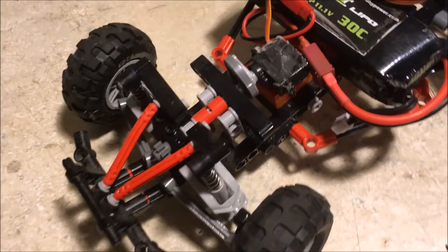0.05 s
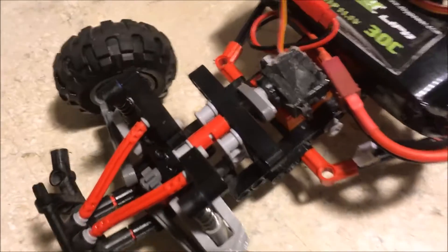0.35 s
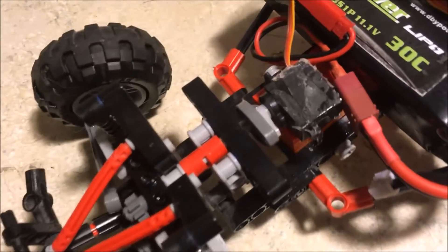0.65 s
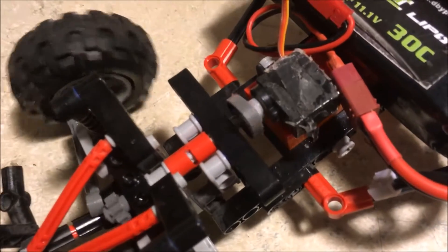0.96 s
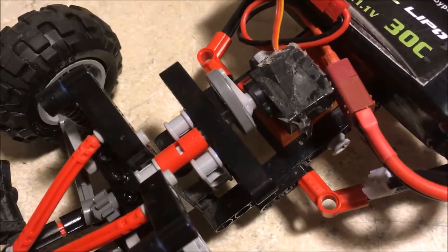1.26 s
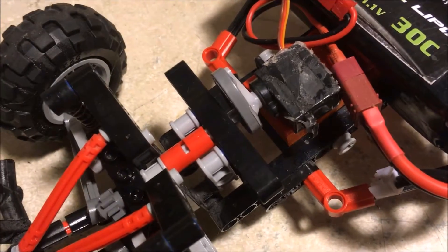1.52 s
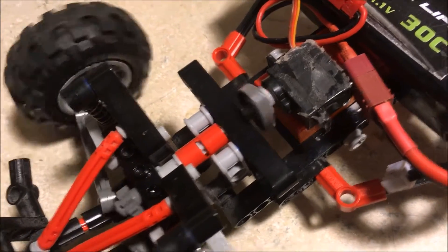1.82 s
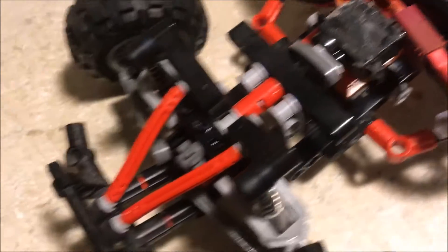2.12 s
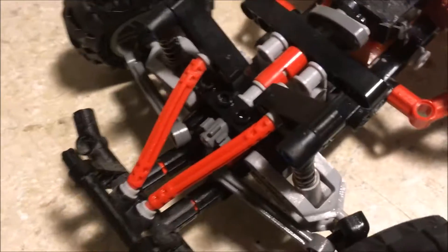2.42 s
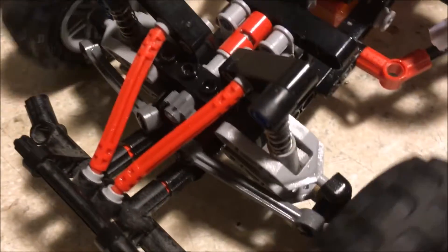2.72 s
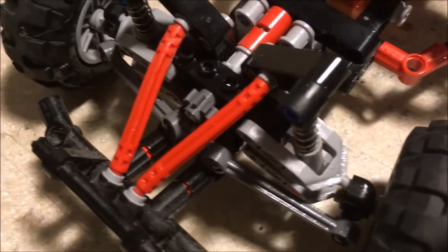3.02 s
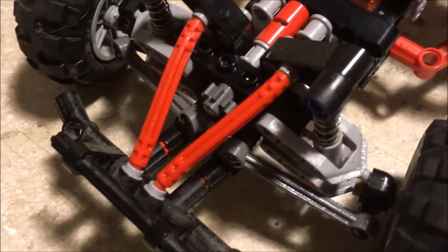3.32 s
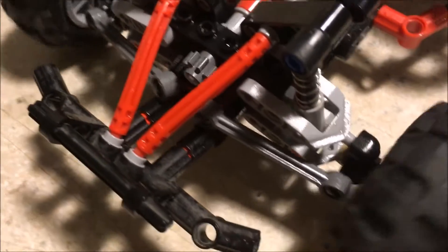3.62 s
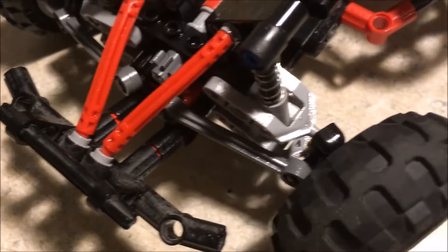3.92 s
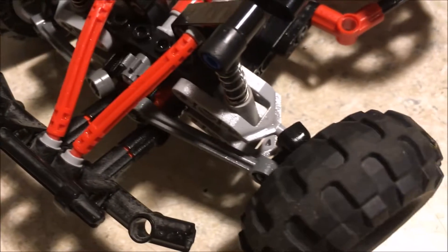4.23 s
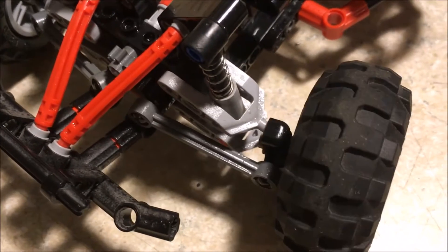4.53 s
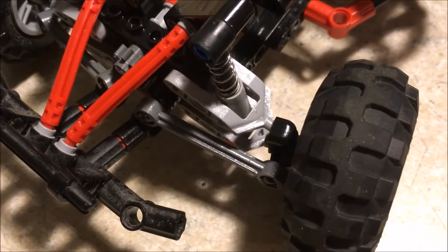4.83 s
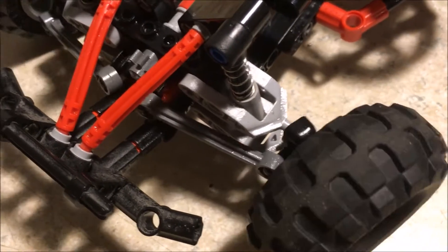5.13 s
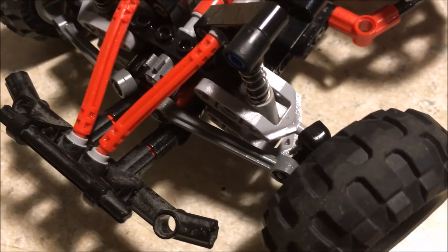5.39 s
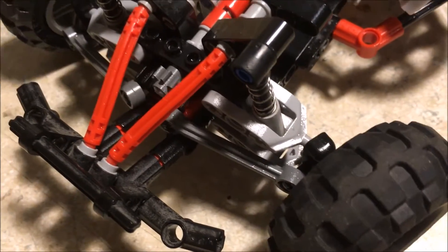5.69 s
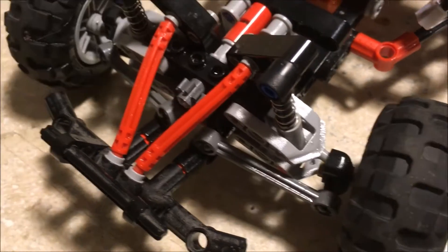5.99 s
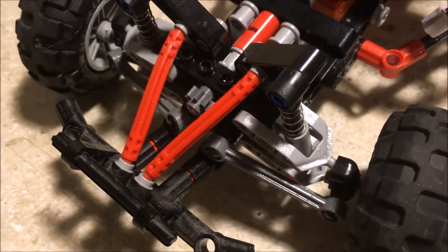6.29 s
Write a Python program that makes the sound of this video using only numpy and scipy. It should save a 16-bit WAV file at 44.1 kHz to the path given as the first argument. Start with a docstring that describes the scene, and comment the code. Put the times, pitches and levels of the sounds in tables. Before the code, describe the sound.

Close to a plastic toy car in a small room, a steering servo ticks rapidly as it holds still, then whirs briefly with rattling gears and a soft plastic knock. This repeats about eight times, a couple of the whirs coming as quick doubles. The tone shifts slightly as the microphone goes from above the servo to the front axle. A low machine hum and faint hiss continue underneath.

```python
"""Close up, a hobby servo whirs in short bursts, swinging a plastic toy car's front wheels side to side.
On each swing its gear teeth rattle the case, the mesh growls in the chassis and the steering links knock.
Between swings it holds the wheels with one tick per control pulse. The car stands on a hard floor in a
small room where mains-driven machines hum; the microphone is above the servo, later at the front axle."""
import sys
import numpy as np
from scipy import signal
from scipy.fft import rfft, irfft
from scipy.io import wavfile
from scipy.ndimage import uniform_filter1d

SR = 44100
rng = np.random.default_rng(int(sys.argv[2]) if len(sys.argv) > 2 else 0)


def digitize_waveform(pressure):
    """Quantize a signal to 16-bit integers and store it at the path in sys.argv[1].

    Rows of a 2-D input are taken as channels; values are limited to [-1, 1].
    """
    field = np.atleast_2d(pressure).T
    bounded = np.clip(field, -1, 1)
    quanta = np.round(bounded * 32767).astype(np.int16)
    wavfile.write(sys.argv[1], SR, quanta)


N = 288837

# The servo case's resonances, heard from above and from the front axle.
# Each row: frequency in Hz, width in Hz, relative level in dB.
CASE_FROM_ABOVE = [(3350, 700, -23), (4280, 450, -17), (5350, 450, -19), (6650, 500, -14), (7100, 350, -18),
                   (8050, 400, -12), (8850, 650, 0), (9450, 600, 0), (11300, 800, -13), (12300, 1000, -7),
                   (13600, 1200, -10.5), (15100, 1300, -10)]
CASE_FROM_AXLE = [(3300, 900, -23), (4270, 400, -10), (5350, 550, -14), (6750, 1100, -6), (8600, 550, -4),
                  (9450, 700, 1), (11150, 750, 0), (12000, 900, -2), (13400, 900, 1), (14500, 1000, -3),
                  (15300, 900, -5)]
MIC_MOVE_S = 2.4  # from here on the microphone is at the axle


def undb(db):
    """Decibels to gain."""
    return 10 ** (np.asarray(db) / 20)


def unit(x):
    """Scale to rms 1."""
    return x / np.sqrt(np.mean(x ** 2) + 1e-18)


def add(out, start_s, x):
    """Mix x into out from start_s."""
    i = max(int(start_s * SR), 0)
    out[i:i + len(x)] += x[:max(N - i, 0)]


def through(x, response):
    """Convolve, keeping the length."""
    return signal.fftconvolve(x, response)[:len(x)]


def bandpass(x, low_hz, high_hz):
    """Keep one band, with gentle slopes."""
    return signal.sosfilt(signal.butter(2, [low_hz, high_hz], "band", fs=SR, output="sos"), x)


def flatten(x, bins=41):
    """Flatten the broad spectrum of a burst, leaving its fine peaks; unit energy."""
    spectrum = rfft(x)
    broad_power = uniform_filter1d(np.abs(spectrum) ** 2, bins)
    flat = irfft(spectrum / np.sqrt(broad_power + 1e-18), len(x))
    return flat / np.linalg.norm(flat)


def steady_noise(points, rms_db):
    """Noise whose spectrum follows (Hz, relative dB) points."""
    hz, db = np.transpose(points)
    f = np.fft.rfftfreq(N, 1 / SR)
    shape = undb(np.interp(np.log(f + 1), np.log(hz), db))
    return undb(rms_db) * unit(irfft(rfft(rng.standard_normal(N)) * shape, N))


def tail(t60, size):
    """Dense decaying reflections of unit energy."""
    response = rng.standard_normal(size) * np.exp(-np.log(1000) * np.arange(size) / SR / t60)
    return response / np.linalg.norm(response)


def damped_mode(hz, t60, size):
    """One struck resonance, falling 60 dB in t60 seconds."""
    t = np.arange(size) / SR
    return np.sin(2 * np.pi * hz * t) * np.exp(-np.log(1000) * t / t60)


def room_tone():
    """Across the room, motors near the mains frequency beat against each other over moving air."""
    # The machines' hum. Each row: frequency in Hz, rms level in dB.
    hum_tones = [(58.6, -45), (112.6, -51), (117.2, -57), (119.8, -52), (171.5, -66), (188.3, -61),
                 (225.1, -63), (258.3, -66), (351.6, -70), (360, -68), (410.3, -69)]
    # Spectra of moving air, low rumble and high hiss. Each row: frequency in Hz, relative density in dB.
    air = [(82, -15.5), (140, -11), (222, -0.5), (302, -10.5), (348, -6), (381, -16), (411, -9.5),
           (581, -19.5), (636, -16.5), (1730, -33), (3000, -35.5), (3900, -37), (6600, -120)]
    rumble = [(20, -41), (45, -5), (70, -8), (125, -3), (160, -13.5), (400, -79)]
    hiss = [(1500, -62), (3000, -4.5), (7000, 13), (11000, 7.5), (16000, 18.5)]
    t = np.arange(N) / SR
    hum = sum(np.sqrt(2) * undb(db) * np.sin(2 * np.pi * (hz * t + rng.random())) for hz, db in hum_tones)
    return hum + steady_noise(air, rms_db=-53) + steady_noise(rumble, -55.5) + steady_noise(hiss, -63)


def shell(modes, t60, ring_db, skirt=1.559, low_cut_hz=3000, size=4096):
    """Impulse response of a small plastic shell: broad resonances, little bass, weak modes ringing on."""
    f = np.fft.rfftfreq(size, 1 / SR)
    power = sum(undb(db) ** 2 / (1 + (2 * (f - hz) / width) ** 2 / skirt) ** skirt
                for hz, width, db in modes)
    power *= 1e-3 + 1 / (1 + (low_cut_hz / (f + 1)) ** 6)
    cepstrum = irfft(np.log(power))[:size // 2]  # minimum phase keeps the attack sharp
    cepstrum[0] /= 2
    strike = irfft(np.exp(rfft(cepstrum, size)))
    ring = undb(ring_db) * tail(t60, size)
    ring[0] += 1
    response = through(strike, flatten(ring))[:size // 2]
    return response / np.linalg.norm(response)


def chassis():
    """Impulse response of the frame and steering links."""
    # The frame's modes. Each row: frequency in Hz, 60 dB decay time in seconds, relative level in dB.
    frame_modes = [(459.37, 0.04473, 0), (521.97, 0.06108, 2.5), (569.13, 0.05512, 1),
                   (680.55, 0.1483, -6.5), (966.6, 0.02377, -9), (1128.6, 0.02264, -17),
                   (1199.5, 0.1143, -13.5), (1450.8, 0.1734, -25)]
    response = sum((-1) ** k * undb(db) * damped_mode(hz, t60, size=6000)
                   for k, (hz, t60, db) in enumerate(frame_modes))
    return response / np.abs(response).max()


def lid():
    """Impulse response of the servo's lid, which sings along on one narrow note."""
    # The lid's mode: frequency in Hz, 60 dB decay time in seconds, level in dB against the case.
    lid_mode = (4300, 0.02913, -24.5)
    hz, t60, db = lid_mode
    response = damped_mode(hz, t60, size=2048)
    return undb(db) * response / np.linalg.norm(response)


def chatter(decay_s, size=2048):
    """Loose parts chatter for an instant: a fast-fading burst of noise, longer ones with more energy."""
    t = np.arange(size) / SR
    burst = rng.standard_normal(size) * np.exp(-(t / decay_s) ** 2)
    return np.sqrt(decay_s * SR) * flatten(burst, bins=33)[:size * 3 // 4]


def pivot_squeak():
    """A steering pivot squeaks once: a faint tone that swells and fades."""
    # The squeak: start in seconds, length in seconds, pitch in Hz, peak level in dB.
    squeak = (2.725, .04, 1178, -48)
    start, length_s, hz, db = squeak
    t = np.arange(int(length_s * SR)) / SR
    out = np.zeros(N)
    add(out, start, undb(db) * np.sin(np.pi * t / length_s) * np.sin(2 * np.pi * hz * t))
    return out


def link_knocks(crack_gain_db=2, scrape=0.05431):
    """Loose steering links take up their play and thud on the chassis with a short crack."""
    # The knocks. Each row: start in seconds, relative levels of thud and crack in dB.
    knocks = [(.218, -46.5, -45), (.238, -54.5, -45.5), (.377, -44, -50.5), (1.047, -39.5, -43.5),
              (1.075, -40, -55), (1.818, -41.5, -44), (1.931, -38, -56), (2.727, -41.5, -45.5),
              (3.555, -47, -44.5), (3.589, -41.5, -46.5), (3.719, -35, -51), (4.376, -40.5, -44.5),
              (5.024, -43, -41.5), (5.097, -29, -36.5)]
    blows, cracks = np.zeros(N), np.zeros(N)
    for start, thud_db, crack_db in knocks:
        blow = scrape * chatter(decay_s=0.011263)
        blow[0] += 1
        add(blows, start, undb(thud_db) * blow)
        add(cracks, start, undb(crack_db + crack_gain_db) * chatter(decay_s=0.015303))
    return through(blows, chassis()) + bandpass(cracks, 950, 2200)


def servo_holding(control_hz=45.15, tick_s=0.00158, variation=0.8397, tick_gain_db=-6, jerk_gain_db=-1):
    """Each control pulse ticks the motor, lower and less even under strain; longer pulses jerk the gears."""
    # The holds. Each row: first tick in seconds, end in seconds, relative level in dB, strain from 0 to 1.
    holds = [(.0049, .14, -41, 0), (.469, .94, -41.5, 0.69), (1.268, 1.79, -39.5, 0.88),
             (2.041, 2.67, -42, 0), (2.972, 3.5, -37.5, 0), (3.835, 4.29, -41, 0.02),
             (4.566, 5.0, -38.5, 0), (5.252, 5.75, -40.5, 0.08), (6.006, 6.55, -39.5, 0.13)]
    # The jerks. Each row: start in seconds, relative level in dB, decay time in seconds.
    jerks = [(0.139, -42, 0.006527), (.16, -34.5, 0.00464), (0.581, -38, 0.00138), (.757, -35.5, 0.00104),
             (0.955, -38, 0.01292), (0.98, -36, 0.00962), (1.333, -35, 0.000837), (1.421, -33.5, 0.0005687),
             (1.799, -33, 0.006223), (2.086, -49.5, 0.001566), (2.6833, -35, 0.012266),
             (2.715, -29, 0.00934), (3.06, -35.5, 0.0018), (3.104, -33, 0.000828), (3.327, -43.5, 0.001053),
             (3.503, -40.5, 0.007217), (3.525, -33, 0.00814), (4.3, -37, 0.01016), (4.328, -33.5, 0.008686),
             (5.01, -34, 0.00452), (5.039, -46.5, 0.00511), (5.756, -39.5, 0.00966),
             (6.073, -36.5, 0.000698)]
    # Resonances of a light tick and of one against a strained linkage.
    # Each row: frequency in Hz, width in Hz, relative level in dB.
    light_modes = [(4350, 330, -4), (6100, 1000, -11), (8650, 450, -7), (9800, 450, -3), (11300, 450, 3),
                   (12600, 500, -2), (13780, 480, 2.5), (15000, 550, -1)]
    strained_modes = [(2150, 500, -13), (3950, 400, -3), (4400, 550, 0), (5300, 750, 0), (6300, 800, -6),
                      (7500, 600, -6), (9500, 2000, -7), (11700, 1200, -6), (12900, 800, -2),
                      (14300, 900, -7), (15400, 700, -4)]
    out = np.zeros(N)
    for first, end, db, strain in holds:
        common = chatter(tick_s)  # makes the ticks of one hold sound alike
        light = shell(light_modes, t60=0.05677, ring_db=-5.5)
        strained = shell(strained_modes, t60=0.09066, ring_db=-7.5)
        ring = (1 - strain) * light + strain * strained
        ring /= np.linalg.norm(ring)
        scatter_db = 2.57 + 2 * strain
        for start in np.arange(first, end, 1 / control_hz):
            tick_db = db + tick_gain_db + scatter_db * rng.uniform(-1.9493, 2.3484)
            tick = (common + variation * chatter(tick_s)) / np.hypot(1, variation)
            add(out, start, undb(tick_db) * through(tick, ring))
    snap, above, axle = (shell(modes, t60=0.012014, ring_db=7.5)
                         for modes in (strained_modes, CASE_FROM_ABOVE, CASE_FROM_AXLE))
    for start, db, decay_s in jerks:
        # short jerks snap against the linkage, long ones rattle the case
        snap_share = np.exp(-(decay_s / 0.004694) ** 2)
        case = above if start < MIC_MOVE_S else axle
        ring = np.sqrt(snap_share) * snap + np.sqrt(1 - snap_share) * case
        ring /= np.linalg.norm(ring)
        add(out, start, undb(db + jerk_gain_db) * through(chatter(decay_s), ring))
    return out


def tooth_impacts(phase, scatter_db=2, jitter_cycles=0.25):
    """Gear teeth meet: one click per cycle of phase, uneven in strength and timing."""
    cycles = np.arange(1, int(phase[-1]))
    timing, strength = rng.standard_normal((len(cycles), 2)).T
    at = np.interp(cycles + jitter_cycles * timing, phase, np.arange(len(phase))).astype(int)
    return np.bincount(at, undb(scatter_db * np.clip(strength, -2, 2)), len(phase))


def gear_swing(motion, case, pitch_sag=0.25, unsteady=0.024, throb=0.401, drag_db=3, slack_grind=0.7852,
               bite_s=0.009154, release_s=0.008066, ease_db_per_s=55.5):
    """The motor spins up and brakes; pinion teeth rattle the case, a slower mesh growls under load."""
    length_s, spin_up_s, brake_s, top_hz, rattle_db, play_s, load_s, growl_db, grind_db = motion
    t = np.arange(int(length_s * SR)) / SR
    braking = np.clip(1 - (t[-1] - t) / brake_s, 0, 1)
    drive = (1 - np.exp(-t / spin_up_s)) * (1 - braking ** 2)
    speed = 1 - pitch_sag * (1 - drive)
    # the load builds as the links bite, eases as the wheels turn and drops as the links go slack
    loaded_s, slack_s = np.maximum(t - play_s, 0), np.maximum(t - play_s - load_s, 0)
    grip = (1 - np.exp(-loaded_s / bite_s)) * np.exp(-slack_s / release_s)
    ease = undb(-ease_db_per_s * loaded_s)
    rattle_gain = undb(rattle_db) * drive ** 1.7224
    growl_gain = undb(growl_db) * drive * grip * ease
    grind_gain = undb(grind_db - 1) * drive * (slack_grind + (1 - slack_grind) * grip) * ease
    wobble = unit(bandpass(rng.standard_normal(len(t)), 12, 70))
    flutter = unit(bandpass(rng.standard_normal(len(t)), 30, 130.27))
    mesh_phase = np.cumsum(top_hz * speed * (1 + unsteady * wobble)) / SR
    # the pinion meshes four times as fast; its load swells with every tooth of the slower gear
    load = (1 + throb * np.cos(2 * np.pi * mesh_phase)) * undb(2.32 * flutter)
    teeth = tooth_impacts(4 * mesh_phase) * load
    rattle = unit(through(teeth - teeth.mean(), case))
    growl = unit(np.sin(2 * np.pi * mesh_phase) * undb(3 * flutter))
    # tooth flanks slide under the same load, harder whenever the motor drags, and shake the chassis
    sliding = load * undb(-drag_db * wobble) * rng.standard_normal(len(t))
    clatter = undb(-11) * unit(through(sliding, chassis()))
    grind_low = unit(bandpass(sliding, 900, 1643.5))
    grind_high = undb(-0.5) * unit(bandpass(sliding, 1800, 2618.9))
    grind = unit(grind_low + grind_high)
    return rattle_gain * rattle + grind_gain * grind + growl_gain * (growl + clatter)


def servo_steering(detune=0.006, scatter_db=1, tilt_centre_hz=9000):
    """The servo swings the wheels; the case's ring varies a little in pitch and brightness each time."""
    # The swings. Each row: start, length, spin-up and braking in seconds, full-speed mesh rate in Hz,
    # relative rattle level in dB, free play and time under load in seconds,
    # relative growl and grinding levels in dB, brightness in dB per octave.
    swings = [ (0.149, 0.30134, 0.0637, 0.08859, 640.3, -27.5, 0.0509, 0.2078, -63.5, -56.5, -1),
              (0.963, 0.16683, 0.04852, 0.05516, 637, -23.5, 0.07303, 0.04686, -45.5, -58, 0),
              (1.131, 0.1254, 0.010428, .11, 636.4, -21, 0.03668, 0.06604, -51.5, -56, -0.5),
              (1.796, 0.23944, 0.02791, 0.07527, 627.7, -26, 0.03, 0.1685, -49.5, -52, -0.5),
              (2.688, 0.25941, 0.05934, 0.0935, 671.4, -24, 0.06584, 0.14456, -41.5, -51, 1),
              (3.526, 0.14223, 0.020444, 0.11884, 639.3, -27, 0.02225, 0.0602, -60.5, -57.5, 0),
              (3.676, 0.1525, 0.00892, 0.079, 631.7, -29, 0.03857, 0.0779, -52, -55.5, -3),
              (4.305, .242, .034, 0.1, 669.9, -25.5, 0.05214, 0.08258, -41, -54.5, 2),
              (5.02, 0.23521, 0.015162, 0.10416, 713, -29, 0.05268, 0.09854, -45.5, -50.5, -2),
              (5.757, 0.23558, .033, 0.107, 669.7, -26, 0.03964, 0.14594, -42, -50.5, -1.5), ]
    out = np.zeros(N)
    for start, *motion, tilt_db in swings:
        modes = CASE_FROM_ABOVE if start < MIC_MOVE_S else CASE_FROM_AXLE
        varied_modes = []
        for hz, width, db in modes:
            mode_hz = hz * (1 + detune * rng.standard_normal())
            mode_db = db + tilt_db * np.log2(hz / tilt_centre_hz) + scatter_db * rng.standard_normal()
            varied_modes.append((mode_hz, width, mode_db))
        case = shell(varied_modes, t60=0.032, ring_db=-2) + lid()
        add(out, start, gear_swing(motion, case))
    return out


def scene():
    """One microphone close to the car, with the small room's short echo and hum behind it."""
    car = servo_steering() + servo_holding() + link_knocks() + pivot_squeak()
    echo = through(car, tail(t60=0.21305, size=16000))
    return (car + undb(-21.5) * echo + room_tone())[None]


def record(dry):
    """A steep low-pass cuts the treble above 15750 Hz."""
    return signal.sosfilt(signal.ellip(10, .2, 70, 15750, fs=SR, output="sos"), dry)


dry = scene()
out = record(dry)
digitize_waveform(out)
```